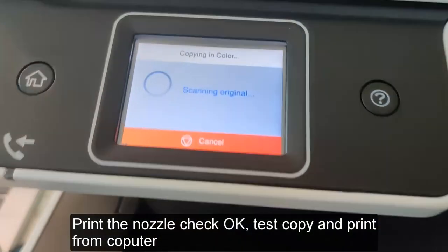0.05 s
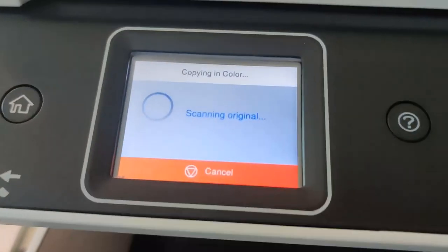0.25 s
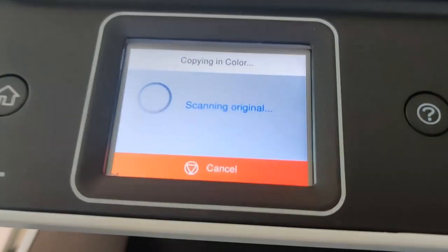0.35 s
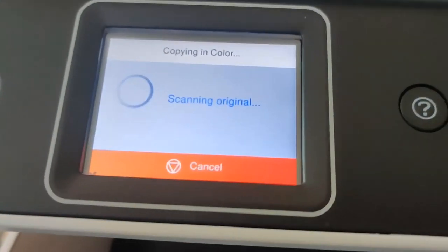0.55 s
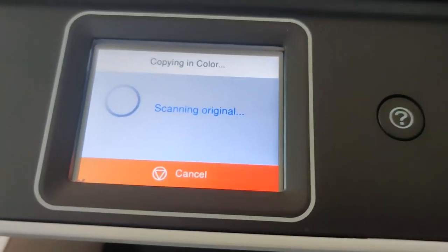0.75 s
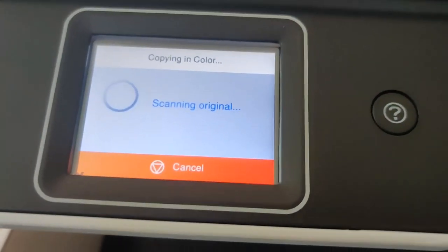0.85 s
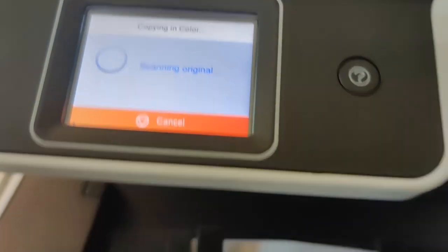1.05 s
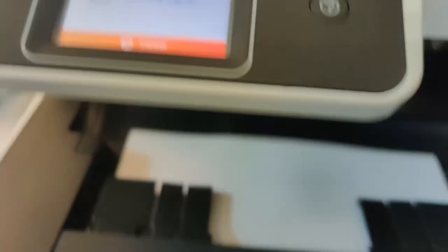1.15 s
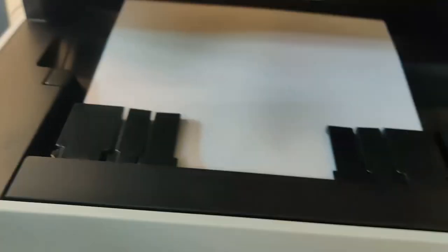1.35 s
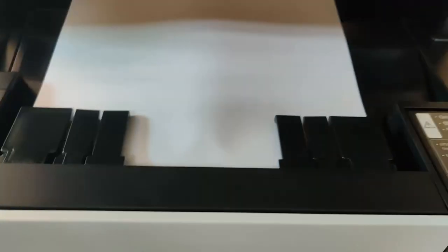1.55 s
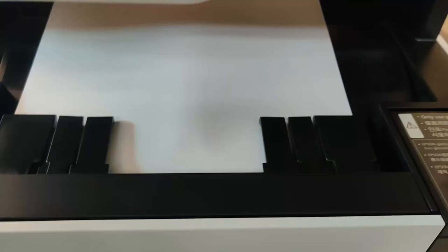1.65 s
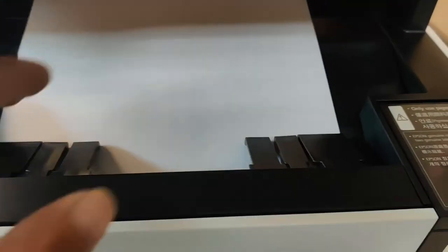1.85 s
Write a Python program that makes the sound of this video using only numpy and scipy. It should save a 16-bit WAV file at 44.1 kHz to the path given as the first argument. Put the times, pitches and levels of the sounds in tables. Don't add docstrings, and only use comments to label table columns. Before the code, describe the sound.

An inkjet printer feeds paper in a small quiet room, heard close on a hand-held phone. From 0.2 s gears clatter and whine; a dull finger bump hits the left side at 0.24 s. Jolts and paper scraping grow from 0.45 s, and scanner hum joins near 0.6 s. After a tiny gap at 1 s, a shorter pull ends in a sharp latch snap at 1.25 s. Hum remains, with a faint click at 1.8 s.

```python
import sys
import numpy as np
from scipy import signal
from scipy.fft import rfft, irfft
from scipy.io import wavfile
from scipy.ndimage import uniform_filter1d

SR = 44100
rng = np.random.default_rng(int(sys.argv[2]) if len(sys.argv) > 2 else 0)


def transcribe(u):
    v = np.clip(np.atleast_2d(u).T, -1, 1)
    q = np.round(v * 32767).astype(np.int16)
    wavfile.write(sys.argv[1], SR, q)


def voltage_ratio(level):
    return 10 ** (np.asarray(level, float) / 20)


N = 83790
t = np.arange(N) / SR


def level(x, db):
    return x * voltage_ratio(db) / np.sqrt(np.mean(x ** 2))


def colour(x, table):
    hz, db = np.array(table, float).T
    f = np.fft.rfftfreq(N, 1 / SR) + 1
    gain = voltage_ratio(np.interp(np.log(f), np.log(hz), db))
    return irfft(rfft(x) * gain, N)


def ring(x, hz, width_hz):
    b, a = signal.iirpeak(min(hz, 0.45 * SR), hz / width_hz, SR)
    return signal.lfilter(b, a, x)


def walk(rate):
    k = int(SR / rate)
    steps = np.repeat(rng.standard_normal(N // k + 1), k)
    smooth = uniform_filter1d(uniform_filter1d(steps, k), k)
    return level(smooth[:N], 0)


def grains(per_s, spread_db):
    happens = rng.random(N) < per_s / SR
    size = voltage_ratio(spread_db * np.minimum(rng.exponential(size=N), 3.5))
    knock, hiss = rng.standard_normal((2, 3, N))
    return level(happens * size * knock + 0.2 * hiss, 0)


def tone(hz, wobble=0.002, flutter_db=2.0):
    turns = np.cumsum(hz * (1 + wobble * walk(12))) / SR
    phase = 2 * np.pi * (turns + rng.random((3, 1)))
    return np.sqrt(2) * voltage_ratio(flutter_db * walk(24.42)) * np.sin(phase)


def fade(start, t60, rise):
    u = np.maximum(t - start, 0)
    return (1 - np.exp(-u / rise)) * np.exp(-np.log(1000) * u / t60)


def pair(paths):
    alike_below_hz = 1074
    b, a = signal.butter(3, alike_below_hz, fs=SR)
    low = signal.filtfilt(b, a, paths)
    return low[0] + paths[1:] - 0.73 * low[1:]


def space(x):
    t60_s, tail_db = 0.53, -13
    u = t[:22050]
    tail = rng.standard_normal(len(u)) * voltage_ratio(-60 * u / t60_s) * (u > 0.004)
    echo = level(tail, tail_db) / np.sqrt(len(u))
    return x + signal.fftconvolve(x, echo[None], axes=1)[:, :N]


# (pitch [Hz], level [dB])
HUM = [(191, -72), (252, -78), (301, -76), (502, -79), (603, -77.5), (760, -76), (2369, -101)]
# (frequency [Hz], level per Hz [dB])
AIR = [(18, -27), (30, -1.5), (415, -11), (754, -8), (1600, -16.5), (2430, -16), (2840, -22.5),
       (12500, -35.5), (15000, -46)]


def room():
    noise = rng.standard_normal((3, N))
    air = level(colour(noise, AIR), -66) * voltage_ratio(1.1 * walk(6.16))
    hum = sum(voltage_ratio(db) * tone(hz, wobble=0.004, flutter_db=1.8) for hz, db in HUM)
    return air + hum


# (multiple of the step rate, level [dB])
STEPPER = [(3, -70), (6, -79), (8, -80), (9, -72), (10, -79), (11, -79), (12, -72), (13, -77), (14, -80),
           (15, -74), (17, -83), (21, -81), (33, -91), (34.5, -78), (64, -94), (65, -89), (70, -95),
           (75, -93)]
# (frequency [Hz], level per Hz [dB])
RATTLE = [(100, -4), (300, 2), (1000, -10.5), (1700, -26.5), (3500, -9.5), (4950, -20), (6500, -25.5),
          (14000, -16)]


def scanner():
    start_s, spin_up_s, step_hz = 0.57, 0.078, 76.33
    on = np.clip((t - start_s) / spin_up_s, 0, 1)
    lines = 0
    for k, db in STEPPER:
        hz = k * step_hz
        lines = lines + voltage_ratio(db) * tone(hz, wobble=0.8 / hz, flutter_db=1.5)[0]
    hum = np.array([lines, np.roll(lines, 4)])
    shake = np.exp(-(3 * step_hz * t % 1) / 0.29)
    rattle = shake * rng.standard_normal((3, N))
    return on * (hum + pair(level(colour(rattle, RATTLE), -69.5)))


def lobe(start, length):
    return np.sin(np.pi * np.clip((t - start) / length, 0, 1) ** 0.83)


def bump():
    start_s, push_s, back_s = 0.2407, 0.0027, 0.0067
    swing = lobe(start_s, push_s) - voltage_ratio(-8) * lobe(start_s + push_s, back_s)
    b, a = signal.butter(2, 600, fs=SR)
    swing = signal.filtfilt(b, a, swing)
    leak_db = np.array([[0], [-17]])
    return swing * voltage_ratio(-21 + leak_db)


# (time [s], level [dB])
DRAG = [(.18, -79), (.24, -67), (.42, -62), (.47, -47.5), (.55, -51), (.585, -45), (.62, -50), (.8, -52.5),
        (0.952, -49), (.995, -97.5), (1.015, -65), (1.049, -52), (1.17, -48), (1.2, -52), (1.25, -56.5),
        (1.29, -63.5), (1.4, -75.5), (1.5, -83)]
# (frequency [Hz], level per Hz [dB])
PAPER = [(600, -14), (1500, 5.5), (3000, 4.5), (5000, -7.5), (6500, -8.5), (10000, -9.5), (13000, -17),
         (15500, -9)]


def paper():
    scrape = level(colour(grains(per_s=9000, spread_db=1.5), PAPER), 1.25)
    s, db = np.array(DRAG).T
    drag = voltage_ratio(np.interp(t, s, db, left=-100, right=-100))
    settle_s, settle_rise_s = 1.77, 0.022
    settle = voltage_ratio(-72) * np.clip((t - settle_s) / settle_rise_s, 0, 1)
    return scrape * (drag + settle) * voltage_ratio(2.8 * walk(29.85))


# (time [s], pitch [Hz], level [dB])
WHINE = [
    [(.19, 522.3, -67), (.22, 529, -54.5), (.33, 528, -56.5), (.43, 525.7, -54.5), (.49, 525, -44),
     (.555, 533.3, -59), (.62, 527.6, -48), (.655, 531.5, -64)],
    [(.69, 535, -52.5), (.72, 527.3, -48.5), (.76, 525.6, -46), (.81, 530, -51), (.85, 530, -50.5),
     (.88, 535.5, -38), (.91, 538.3, -56.5), (.94, 534, -70)],
]


def whine():
    s, hz, db = np.concatenate(WHINE).T
    fade_in = np.clip((t - s[0]) / 0.016, 0, 1)
    fade_out = np.clip((s[-1] - t) / 0.02, 0, 1)
    mesh = tone(np.interp(t, s, hz), wobble=0.002, flutter_db=-0.36)
    return fade_in * fade_out * voltage_ratio(np.interp(t, s, db)) * mesh


# (time [s], level [dB], brightness [Hz], decay [s])
JOLTS = [(0.184, -60.5, 1800, 0.036), (.264, -69, 2430, 0.012), (.343, -56, 2500, 0.016),
         (0.441, -37, 1600, 0.082), (0.482, -46.5, 4000, 0.045), (0.58, -40, 1970, 0.069),
         (.737, -51, 2500, .03), (0.87, -48.5, 570, 0.12), (0.925, -41, 2340, .05),
         (1.1795, -35.5, 9200, 0.027), (1.262, -51, 290, 0.18), (1.813, -52, 3630, 0.013)]


def jolts():
    out = 0
    for s, db, hz, decay_s in JOLTS:
        noise = rng.standard_normal((3, N))
        rough = ring(ring(noise, hz, 0.84 * hz), hz, 0.84 * hz)
        out = out + voltage_ratio(db) * fade(s, decay_s, rise=0.00073) * level(rough, 0)
    return out


# (pitch [Hz], level [dB], width [Hz])
LATCH = [(1500, -7, 500), (2410, 3, 300), (3370, -2, 600), (4100, -3, 700), (4970, -10, 600),
         (5900, -8, 600), (7700, -8, 800)]


def latch():
    start_s, rebound_s, decay_s, rise_s = 1.2548, 0.0105, 0.037, 0.0003
    hits = fade(start_s, decay_s, rise_s) + 0.12 * fade(start_s + rebound_s, decay_s, rise_s)
    crack = rng.standard_normal((3, N)) * hits
    snap = level(ring(ring(crack, 4700, 14000), 4000, 13500), 0)
    out = snap + sum(level(ring(crack, hz, width), db) for hz, db, width in LATCH)
    return voltage_ratio(-26) * out / abs(out).max()


# (start [s], end [s], level [dB], spin-up [s])
MOVES = [
    (0.183, 0.963, -48, .07),
    (1.017, 1.262, -51, 0.038),
]
BELT_DB = [-17, -11]
# (frequency [Hz], level per Hz [dB])
CASE = [(60, -16), (250, -2), (430, -5.5), (640, -2), (1100, -0.5), (1500, -8), (3000, -6), (5000, -23.5)]
# (pitch [Hz], width [Hz], level [dB])
PANELS = [(394, 16, -25), (590, 30, -16), (680, 30, -15), (780, 30, -18), (925, 30, -18), (1450, 40, -16),
          (1830, 50, -19), (2600, 80, -21)]


def feed():
    teeth = grains(per_s=6000, spread_db=1.6)
    body = level(colour(teeth, CASE), 0)
    for hz, width, db in PANELS:
        body = body + level(ring(teeth, hz, width), db) * voltage_ratio(4 * walk(6.85))
    body = body * voltage_ratio(0.6 * walk(18))
    belt = tone(1266, wobble=0.001, flutter_db=2.5)
    load_db_per_s, coast_s = -1.5, 0.019
    out = 0
    for (start, end, db, spin_up), belt_db in zip(MOVES, BELT_DB):
        speed = np.clip((t - start) / spin_up, 0, 1) ** 0.75
        speed = speed * np.exp(-np.maximum(t - end, 0) / coast_s)
        loudness = voltage_ratio(db + load_db_per_s * (t - start))
        out = out + speed * loudness * (body + voltage_ratio(belt_db) * belt)
    return out


def scene():
    printer = space(feed() + paper() + jolts() + latch())
    return pair(printer + whine() + room()) + scanner() + bump()


def band_limit(x):
    return signal.sosfilt(signal.butter(12, 16450, fs=SR, output="sos"), x)


# (pitch [Hz], width [Hz], gain [dB])
PORTS = [
    [(417, 310, 1.5), (1290, 167, 8.5), (4840, 300, 9.5), (6300, 2700, -2.5), (10800, 8300, -5)],
    [(2463, 200, 13), (4430, 300, -0.5), (5570, 1010, 8.5), (7200, 1030, 8)],
]


def record(dry):
    heard = []
    for x, port in zip(dry, PORTS):
        heard.append(x + sum((voltage_ratio(db) - 1) * ring(x, hz, width) for hz, width, db in port))
    top_cut = signal.butter(8, 14800, fs=SR, output="sos")
    mix = signal.sosfilt(top_cut, np.array(heard))
    return band_limit(mix)


dry = scene()
out = record(dry)
transcribe(out)
```